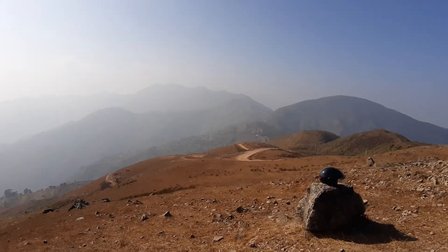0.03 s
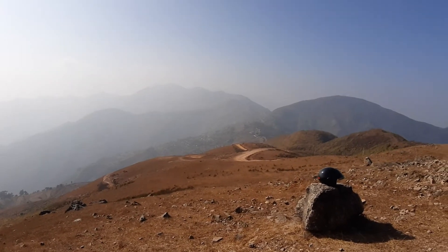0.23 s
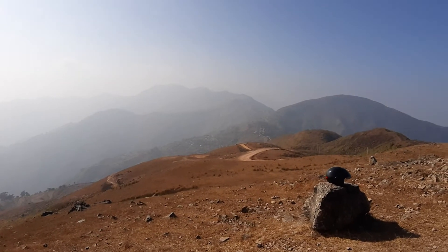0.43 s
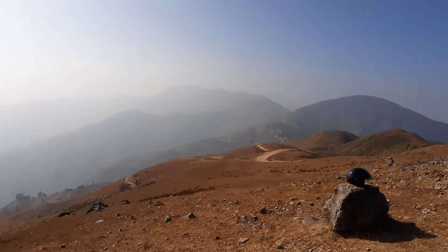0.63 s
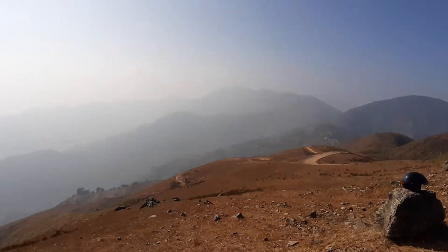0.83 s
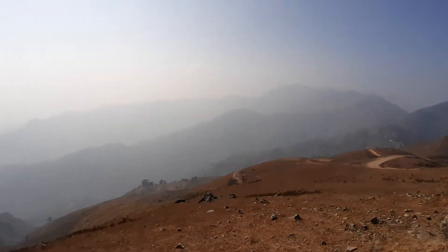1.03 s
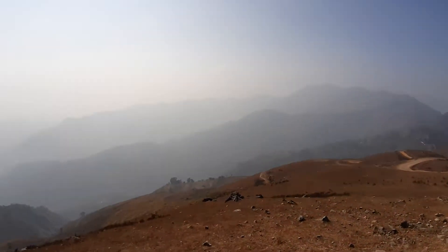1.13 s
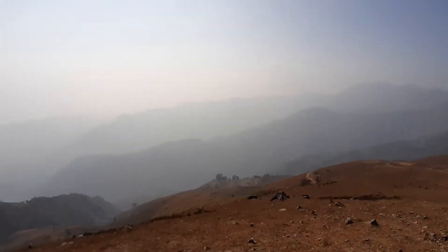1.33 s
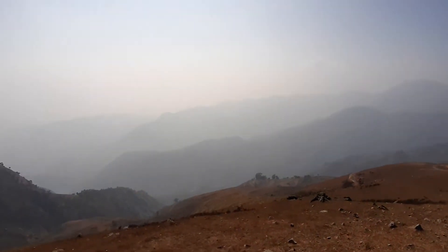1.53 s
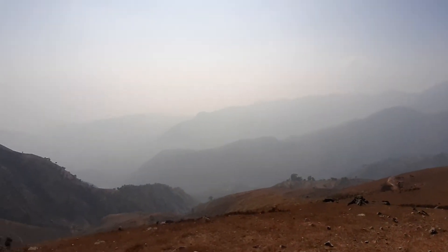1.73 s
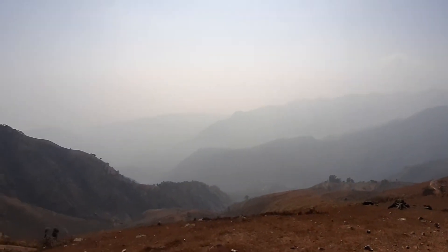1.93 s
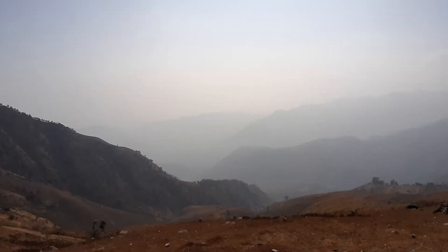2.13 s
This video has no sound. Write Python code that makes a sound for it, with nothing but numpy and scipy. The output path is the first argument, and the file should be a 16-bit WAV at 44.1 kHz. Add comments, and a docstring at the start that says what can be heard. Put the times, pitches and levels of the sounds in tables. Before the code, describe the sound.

Strong wind buffets a hand-held microphone on a bare hilltop, roaring and rumbling with small pops and snaps. It soon drops to weaker, sputtering gusts, with a faint hiss of air behind.

```python
"""A bare hilltop: strong wind buffets the two ports of a hand-held camera, each with its own turbulence.
The left port faces the gale and roars, crackling on the pressure crests; at 0.8 s the wind drops to
weaker gusts. As the camera turns, the right port falls into the lee and only rumbles.
Single eddies pop and snap; a faint hiss lies behind."""
import sys
import numpy as np
from scipy import signal
from scipy.io import wavfile
from scipy.ndimage import uniform_filter1d

SR = 44100
rng = np.random.default_rng(int(sys.argv[2]) if len(sys.argv) > 2 else 0)


def transcribe(signal):
    """Save signal, clipped to [-1, 1], as a 16-bit WAV file at the path in sys.argv[1]."""
    frames = np.atleast_2d(signal).T
    limited = np.clip(frames, -1, 1)
    pcm = np.round(limited * 32767).astype(np.int16)
    wavfile.write(sys.argv[1], SR, pcm)


N = 95785
T = np.arange(N) / SR

# background hiss: t/s, level/dB
HISS_ENVELOPE = [(0, -3), (.7, -9), (.8, -0.5), (1.05, -5.5), (1.23, 2), (1.38, -3), (1.55, 3), (1.75, 0),
                 (1.95, 2.5), (2.15, -1)]
# noise density of hiss, rumble and each port's buffeting: f/Hz, level/dB
HISS_SPECTRUM = [(500, -100), (1500, -106), (2500, -110), (4500, -110), (7000, -112), (9000, -116),
                 (12000, -116), (15000, -118)]
RUMBLE_SPECTRUM = [(25, -43.5), (45, -40.5), (65, -30), (85, -23.5), (140, -21), (200, -29.5), (320, -39.5),
                   (600, -54.5)]
LEFT_SPECTRUM = [(100, -46), (180, -31), (270, -29.5), (390, -24), (600, -29.5), (1000, -35.5),
                 (1400, -43.5), (2000, -54.5), (3000, -59), (4200, -75), (6000, -92.5), (8500, -106)]
RIGHT_SPECTRUM = [(100, -32), (180, -24.5), (280, -26.5), (390, -31), (600, -29.5), (1000, -37.5),
                  (1400, -43), (2000, -52), (3000, -56.5), (4200, -61), (6000, -90.5), (8500, -102)]
# sharpest eddies, left port: t/s, level/dB
SNAP_EDDIES = [(0.357, -1.5), (0.536, -4), (0.558, -3), (1.255, -25.5), (1.417, -24), (1.512, -20),
               (1.557, -16), (1.577, -17), (1.702, -18), (1.787, -30)]
# single eddies: t/s, thump/dB, thump f/Hz, crackle/dB, port (0 left, 1 right)
POP_EDDIES = [(0.123, -31, 510, -15.5, 1), (0.166, -7.5, 302, -22, 1), (0.182, -9.5, 254, -26, 1),
              (0.217, -4.5, 447, -15.5, 1), (0.248, -27, 500, -15, 1), (0.272, -2.5, 600, -23, 0),
              (0.627, -8, 327, -15.5, 1), (0.75, -2, 557, -20, 1), (0.752, -3, 450, -19, 0),
              (0.775, -7, 450, -45, 1), (0.787, -7.5, 547, -42, 0), (0.883, -19.5, 700, -45, 1),
              (0.911, -11.5, 317, -31, 1), (0.926, -17.5, 650, -44, 1), (0.9398, -6.5, 424, -26.5, 1),
              (0.971, -17.5, 590, -39, 1), (1.013, -16.5, 760, -32.5, 1), (1.030, -16, 600, -31, 1),
              (1.041, -10.5, 580, -29, 1), (1.058, -25, 890, -30, 1), (1.0816, -13, 800, -30, 1),
              (1.122, -12, 600, -32, 1), (1.174, -10, 560, -16, 1), (1.205, -10, 500, -27, 0),
              (1.22, -10.5, 650, -19.5, 0), (1.251, -10, 560, -22.5, 1), (1.281, -13.5, 454, -44, 1),
              (1.37, -19, 750, -45, 0), (1.397, -11.5, 395, -43, 0), (1.411, -16, 400, -37, 1),
              (1.44, -22, 810, -36, 0), (1.452, -26, 800, -36, 0), (1.481, -36, 750, -40, 0),
              (1.51, -16, 745, -24.5, 0), (1.551, -26, 900, -21.5, 0), (1.599, -21, 710, -20, 0),
              (1.612, -19, 595, -30, 0), (1.666, -13, 614, -54, 0), (1.725, -23, 805, -24.5, 0),
              (1.737, -17, 750, -40, 0), (1.769, -35, 645, -24, 0), (1.786, -17, 594, -24.5, 0),
              (1.832, -14.5, 600, -51, 0), (1.855, -18.5, 780, -48, 0), (1.906, -19.5, 706, -48, 0),
              (1.98, -17, 450, -59, 0)]
# airflow at each port: t/s, rumble/dB, buffeting/dB, tilt/(dB/oct)
LEFT_FLOW = [(0.0, -20, -15.5, 0.5), (0.13, -36.5, -17, 1.5), (0.24, -21.5, -11.5, -0.14),
             (0.36, -28, -13, 0.6), (0.52, -33.5, -11.2, -1.34), (0.6, -25.5, -15.5, 0.5),
             (0.70, -30, -15, 0.25), (0.74, -25.5, -18, -1), (0.77, -40, -22, -1.5),
             (0.825, -40, -30.5, -8), (0.97, -44.5, -36, -12), (1.075, -46, -34.5, -0.5),
             (1.135, -32.5, -21, -1), (1.22, -33.5, -21.5, 3.0), (1.275, -33.5, -25, -1),
             (1.35, -38, -29.5, -8), (1.41, -27.5, -32.5, 3.5), (1.49, -39, -30.5, -1.5),
             (1.57, -55, -26.5, 3), (1.68, -30, -26.5, -2.4), (1.84, -41, -28, -3.5),
             (1.98, -40, -27, -7.5), (2.17, -51, -29, -10)]
RIGHT_FLOW = [(0.0, -22, -21, -1.5), (0.1, -28.5, -19, -2.5), (0.18, -17, -18, 0.5),
              (0.3, -29.5, -19, -2.3), (0.53, -31, -23, -4), (0.62, -19.5, -24, 0.5),
              (0.69, -30, -22.5, -7), (0.82, -37.5, -26.5, -6.5), (0.99, -45.5, -27, -8.5),
              (1.06, -37.5, -26, -2), (1.18, -28.5, -25.5, 2), (1.33, -30, -31, -4), (1.4, -28, -28.5, -25),
              (1.48, -34, -35.5, -13), (1.7, -31, -58, -2), (1.94, -30.5, -49, 0), (2.06, -20, -50, 0.5),
              (2.17, -30.5, -57, 4)]


def from_db(db):
    """Decibels to gain."""
    return 10 ** (np.asarray(db) / 20)


def unit_rms(x):
    """Scale to unit rms."""
    return x / np.sqrt(np.mean(x ** 2) + 1e-20)


def in_time(rows):
    """Each column of a curve, per sample."""
    times_s, *columns = np.transpose(rows)
    return [np.interp(T, times_s, column) for column in columns]


def butter(x, hz, kind, order=2):
    """Causal Butterworth filter."""
    return signal.sosfilt(signal.butter(order, hz, kind, fs=SR, output="sos"), x)


def drift(hz):
    """Random wander, about unit rms."""
    step, settle = 20, 2000
    pole = np.exp(-2 * np.pi * hz * step / SR)
    noise = rng.standard_normal(N // step + settle + 2)
    slow = signal.lfilter([1], [1, -2 * pole, pole * pole], noise)[settle:]
    return np.interp(np.arange(N) / step, np.arange(len(slow)), unit_rms(slow))


def bands(spectrum):
    """Third-octave noise bands spanning a spectrum: (centre/Hz, noise)."""
    f_hz, level_db = np.transpose(spectrum)
    edges_hz = 22 * 2 ** (np.arange(30) / 3)
    for low, high in zip(edges_hz, edges_hz[1:]):
        if high > f_hz[0] and low < f_hz[-1]:
            hz = np.sqrt(low * high)
            density_db = np.interp(np.log(hz), np.log(f_hz), level_db)
            noise = butter(rng.standard_normal(N + SR // 10), [low, high], "band", order=3)[-N:]
            yield hz, unit_rms(noise) * np.sqrt(high - low) * from_db(density_db)


def levelling_gain(x, window_s=0.04):
    """Gain that evens out a noise's own swells."""
    return 1 / np.sqrt(uniform_filter1d(unit_rms(x) ** 2, int(window_s * SR)) + .05)


def spikes(kicks, width_s, top_hz=4600):
    """Each kick becomes a narrow cusp of pressure."""
    cusp = np.exp(-abs(np.arange(-80, 81)) / (width_s * SR))
    softened = butter(np.convolve(kicks, cusp, "same"), top_hz, "low", order=3)
    return butter(softened, 120, "high", order=1)


def hiss():
    """Faint, smooth hiss of air."""
    level_db, = in_time(HISS_ENVELOPE)
    return from_db(level_db) * sum(noise for _, noise in bands(HISS_SPECTRUM))


def snaps():
    """The sharpest eddies: lone pressure dips reaching into the treble."""
    kicks = np.zeros(N)
    for at_s, level_db in SNAP_EDDIES:
        kicks[int(at_s * SR)] -= from_db(level_db)
    return spikes(kicks, width_s=0.00018)


def pops(width_cycles=0.37, burst_s=.0012, band_hz=(860, 1630), top_hz=3310):
    """An eddy slaps a port: one pressure swing with a burst of crackle inside."""
    out = np.zeros((2, N + SR))
    t = np.arange(-SR // 100, SR // 100) / SR
    for at_s, thump_db, hz, crackle_db, side in POP_EDDIES:
        thump = -np.sin(2 * np.pi * hz * t) * np.exp(-(hz * t / width_cycles) ** 2)
        burst = rng.standard_normal(len(t)) * np.exp(-abs(t) / burst_s)
        burst = butter(butter(burst, band_hz, "band"), top_hz, "low", order=4)
        pop = from_db(thump_db) * thump + from_db(crackle_db) * burst / abs(burst).max()
        start = int(at_s * SR) - len(t) // 2
        out[int(side), start:start + len(t)] += pop
    return out[:, :N]


def rumble(level_db):
    """Large, slow eddies: rolling bass."""
    bass = sum(noise for _, noise in bands(RUMBLE_SPECTRUM))
    return bass * np.sqrt(levelling_gain(bass)) * from_db(level_db)


def buffeting(level_db, tilt_db_oct, spectrum, flutter):
    """Port turbulence: a roar with treble bursts on its crests. Light wind is duller, sputters more."""
    gale_db, flutter_hz = -12.5, 95
    tilt_from_hz, crackle_from_hz, fade_from_hz = 410, 750, 1170
    layers = list(bands(spectrum))
    lull_db = np.clip(gale_db - level_db, 0, 14)
    eddies = (flutter + 0.1 * lull_db) * np.clip(drift(flutter_hz), -2, 1.3)
    roar = unit_rms(sum(noise for hz, noise in layers if hz < crackle_from_hz))
    crests = np.clip(roar, -3, 1.72)
    out = 0
    for hz, noise in layers:
        tilt_oct = np.clip(np.log2(hz / tilt_from_hz), 0, 2.6)
        flutter_db = eddies * (1.5 + tilt_oct)   # passing eddies shake the treble most
        crackle_db = 4.5 * np.clip(np.log2(hz / crackle_from_hz), 0, 2) * crests
        fade_db = 0.4 * np.clip(np.log2(hz / fade_from_hz), 0, 1.5) * (level_db - gale_db)
        shake = unit_rms(from_db(flutter_db + crackle_db))
        out = out + noise * shake * from_db(level_db + fade_db + tilt_db_oct * tilt_oct)
    return out * levelling_gain(roar * from_db(eddies))


def port_wind(flow, spectrum, flutter):
    """Wind at one port; high crests tear into a rasp and steepen into uneven spikes."""
    crest_threshold, spike_gain_db = 0.23, 4
    rasp_gain_db, rasp_hz = -36, (1910, 3900)
    rumble_db, buffet_db, tilt_db_oct = in_time(flow)
    pressure = rumble(rumble_db) + buffeting(buffet_db, tilt_db_oct, spectrum, flutter)
    excess = np.clip(pressure - crest_threshold, 0, .3)
    peaks, _ = signal.find_peaks(pressure, distance=SR // 1200)
    kicks = np.zeros(N)
    kicks[peaks] = excess[peaks] * rng.uniform(0.21, 1, N)[peaks]
    steepening = spikes(kicks, width_s=0.00021)
    rasp = excess * unit_rms(butter(rng.standard_normal(N), rasp_hz, "band", order=3))
    return pressure + from_db(spike_gain_db) * steepening + from_db(rasp_gain_db) * rasp


def scene():
    """Two ports, each with its own wind, hiss and pops; snaps on the left."""
    left = port_wind(LEFT_FLOW, LEFT_SPECTRUM, flutter=-0.09) + snaps() + hiss()
    right = port_wind(RIGHT_FLOW, RIGHT_SPECTRUM, flutter=1) + hiss()
    return np.array([left, right]) + pops()


def record(dry):
    """Soft clip at full scale, then a steep low-pass."""
    cutoff_hz = 15800
    rounded = dry / (1 + dry ** 6) ** (1 / 6)
    return signal.sosfilt(signal.ellip(10, .1, 80, cutoff_hz, fs=SR, output="sos"), rounded)


dry = scene()
out = record(dry)
transcribe(out)
```